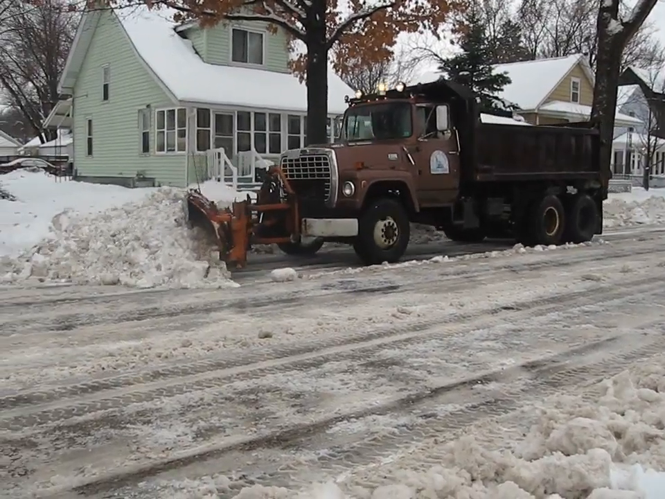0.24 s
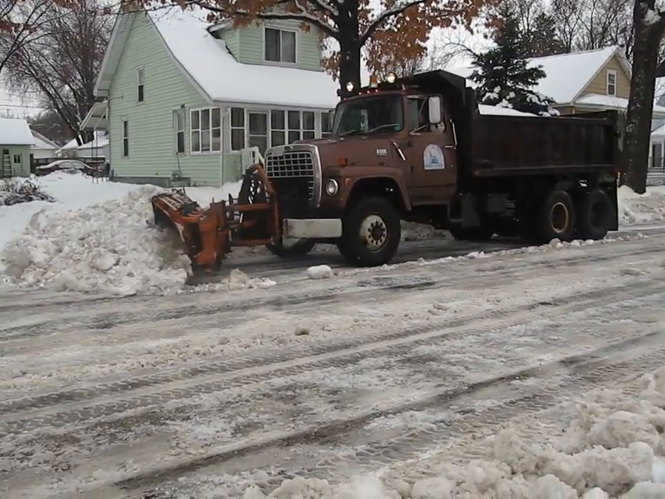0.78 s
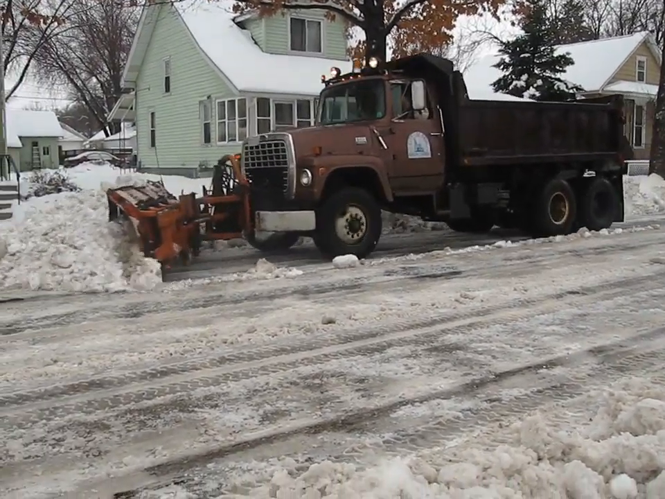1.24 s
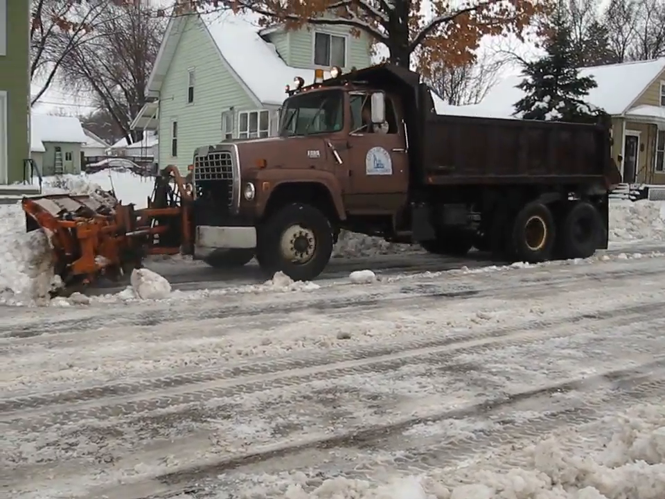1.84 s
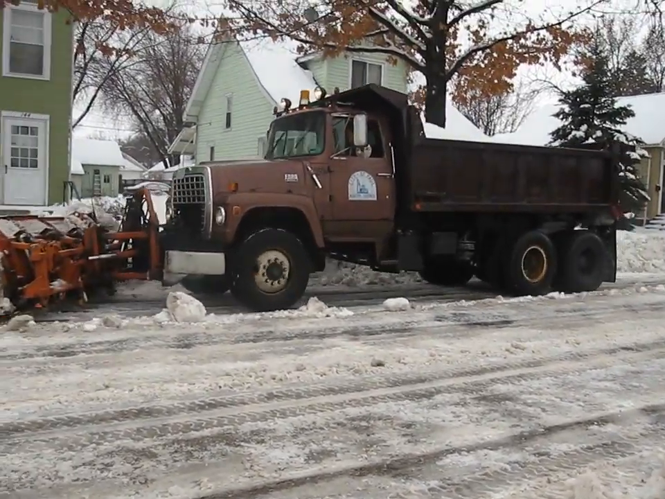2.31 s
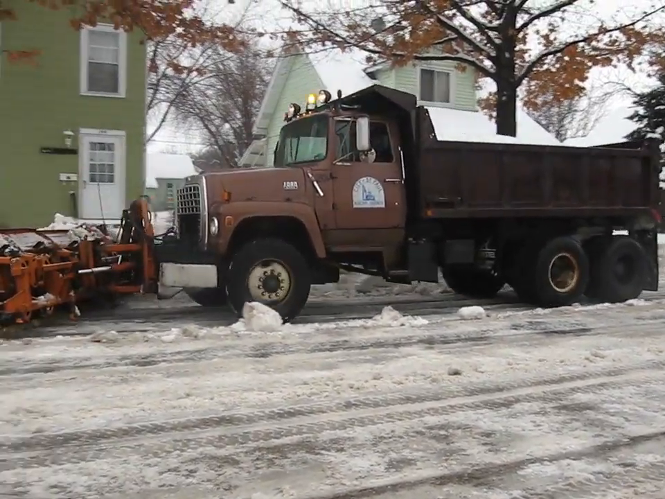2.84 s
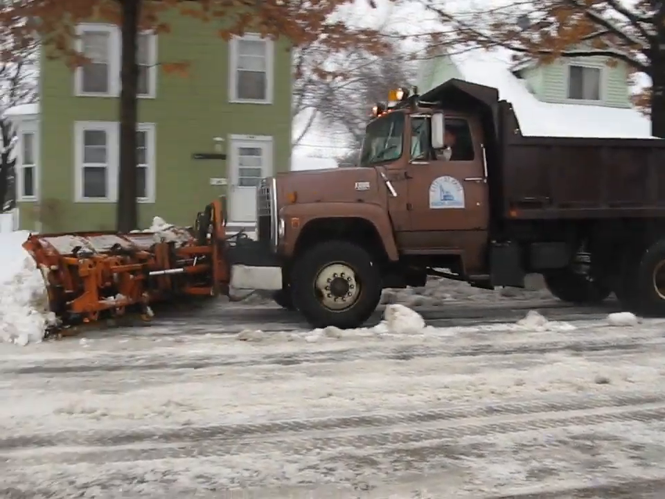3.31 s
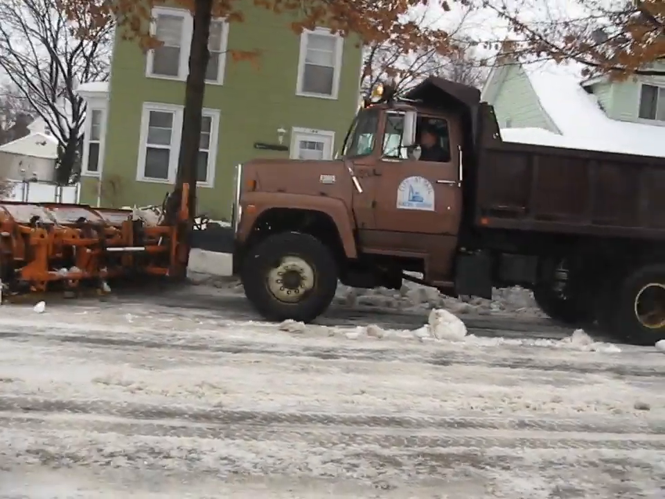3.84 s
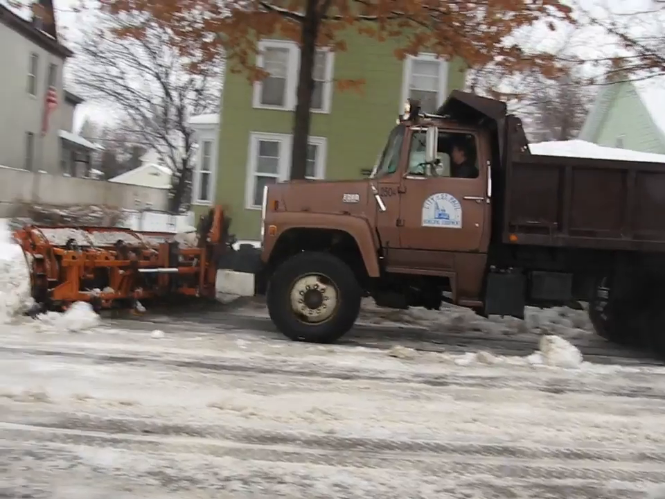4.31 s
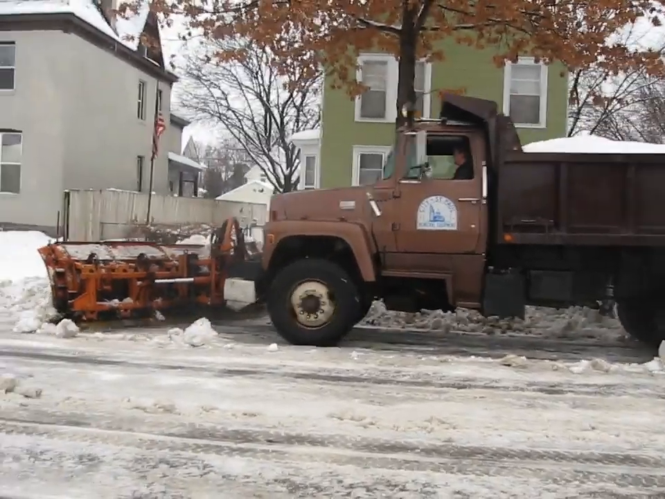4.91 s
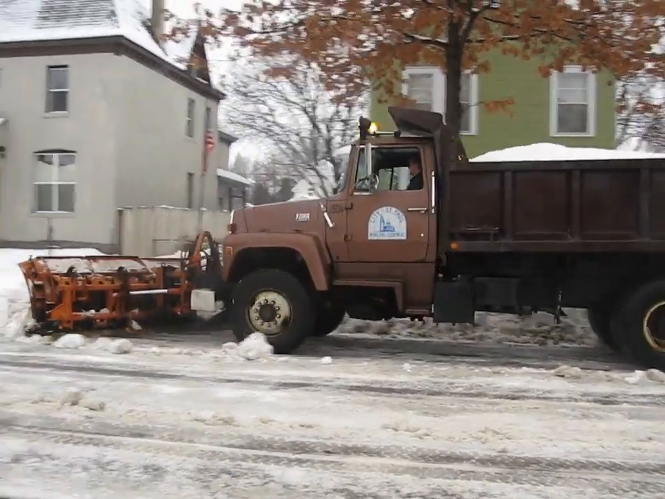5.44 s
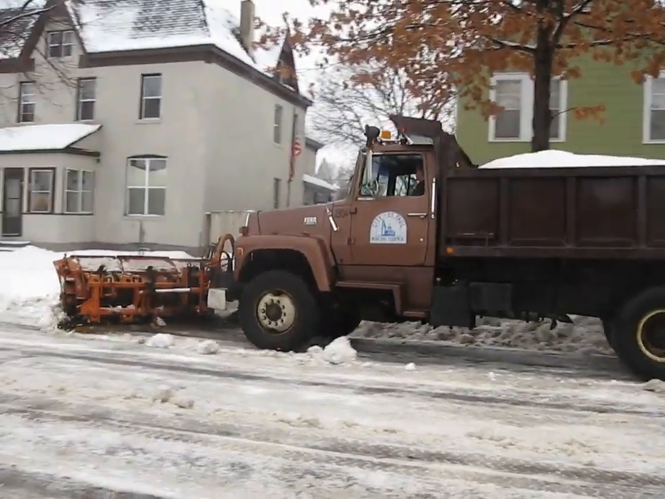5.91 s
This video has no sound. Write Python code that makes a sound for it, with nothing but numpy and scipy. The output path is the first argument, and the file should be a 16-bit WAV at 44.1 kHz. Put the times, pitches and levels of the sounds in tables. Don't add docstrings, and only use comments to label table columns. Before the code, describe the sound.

A heavy diesel plow truck is already running at 0 s and keeps a steady engine speed throughout, heard outdoors across a snowy street by a small camera. A low, pulsing drone and a humming fan tone slowly swell and fade as reflections from houses interfere. Over them lies a constant broadband roar with airy hiss, and a fast metallic injector clatter, about twenty-three loud ticks a second with weaker ones between. From about 1.5 s sharp knocks ring the panels; ticking grows clearer to about 3.5 s as the hood comes abreast, and knocks cluster from 2.3 to 4.8 s. Dull blade bumps come at 2.2 and 2.5 s, with a surge of low rumble near 4 s and a soft push at 4.2 s. Around 5.3 s comes the hardest thud, followed by short scrapes and bumps until 5.7 s over heavier rumble. The engine continues to the end, with coarse, band-limited treble.

```python
import sys
import numpy as np
from scipy import signal
from scipy.fft import rfft, irfft
from scipy.io import wavfile
from scipy.ndimage import uniform_filter1d

SR = 44100
rng = np.random.default_rng(int(sys.argv[2]) if len(sys.argv) > 2 else 0)


def amplitude_ratio(level_db):
    exponent = np.asarray(level_db, float) / 20
    return 10 ** exponent


def generate_wav(sig):
    pcm = np.round(np.clip(np.atleast_2d(sig).T, -1, 1) * 32767).astype(np.int16)
    wavfile.write(sys.argv[1], SR, pcm)


N = 271656
T = np.arange(N) / SR
SLOW = np.arange(0, N + 256, 256) / SR

# t/s, turns counted at the loud tick
CRANK_TURNS = [(0.0038, 0), (1.5416, 35), (2.8169, 64), (3.5204, 80), (4.2236, 96), (5.0143, 114),
               (5.8061, 132), (6.2021, 141)]
# t/s, level/dB
BLOCK_FACING = [(0.0, -28), (0.01, -30.5), (0.31, -31), (1.51, -30.5), (2.76, -34.5), (3.26, -34.5),
                (3.62, -37), (3.76, -34.5), (5.2, -32.5), (5.32, -35.5), (6.04, -30), (6.16, -33)]

# crank order, level/dB
WEAK_ORDERS = [(2, -67), (12, -62), (26, -55), (42, -54.5), (50, -55), (100, -61)]
STEADY_ORDERS = {5: -48.5, 21: -48, 28: -49, 30: -49, 32: -48, 33: -61, 34: -51, 48: -55.5, 49: -59}
ORDER_CANCELS = {3: [-.3, .8, 1.6, 2.6, 3.35, 4.75, 6.5], 6: [-1, 1.35, 2.36, 3.3, 4.38, 4.85, 5.66, 6.5],
                 9: [-.05, .6, 1.5, 2.5, 3.65, 4.45, 4.85, 5.95, 6.4], 12: [-.2, .5, 1.42, 2.4, 2.95, 3.45,
                 3.95, 4.85, 5.6, 6.15, 6.5], 27: [-.3, .4, .7, 3.03, 3.4, 4.0, 5.12, 5.86, 6.3], 7: [-.5,
                 .7, 1.9, 4.25, 5.6, 6.4], 8: [-1.5, 2.5, 7], 11: [-.2, .75, 1.95, 2.75, 3.35, 4.75, 5.5,
                 6.3], 18: [0, 2.1, 3.75, 5.38, 6.5], 36: [-.1, .9, 2.15, 3.45, 4.1, 5.3, 6.4], 39: [.25,
                 1.2, 2.8, 3.7, 4.15, 5.45, 6.3], 40: [-.2, .75, 1.75, 2.3, 2.9, 4.05, 5.0, 5.72, 6.6]}
ORDER_SWELLS = {3: [(.2, -40.5), (.15, -39), (0.2, -41.5), (.5, -49), (.6, -42), (0.4, -38), (0.3, -41)],
                6: [(.2, -22), (0.04, -27), (.65, -30.5), (0, -30.5), (0.7, -33), (0, -28), (0.7, -30.5),
                (.4, -26)], 9: [(0.3, -39.5), (0.6, -33.5), (0.04, -31), (0, -33.5), (0.3, -33.5),
                (0.3, -35), (0, -30), (0.6, -33.5), (.3, -38)], 12: [(0.2, -42), (.4, -37), (.2, -39.5),
                (0.7, -46.5), (.7, -42), (.6, -43), (.5, -45.5), (0.2, -39.5), (0.1, -35.5), (.6, -36),
                (.3, -42)], 27: [(0.3, -31.5), (0.36, -32.5), (0.05, -25.5), (0.3, -41), (.6, -40),
                (.45, -29), (.55, -33.5), (.8, -42), (.3, -40)]}
LESSER_SWELLS = {7: [-45, -47, -46.5, -37, -41.5, -38.5], 8: [-39.5, -39.5, -32], 11: [-47, -40.5, -43, -45,
                 -38.5, -46, -38.5, -36], 18: [-46.5, -46, -43, -42.5, -44], 36: [-40.5, -44, -42.5, -40.5,
                 -43.5, -39.5, -44], 39: [-39, -44.5, -42.5, -39, -41.5, -44, -43], 40: [-42.5, -46.5, -50,
                 -43.5, -37.5, -46, -47, -40, -43]}
LESSER_ECHO_SHARE = 0.32

FAN_PITCH = {1: 186.56, 3: 560.0, 4: 749.4}
FAN_NULLS = {1: [-1.3, 2.15, 2.8, 4.5, 6.1, 6.6], 3: [-.1, 1.3, 2.25, 3.55, 4.9, 5.72, 6.1, 6.5], 4: [-.05,
             .9, 2.15, 3.25, 3.95, 4.35, 5.0, 5.9, 6.4]}
FAN_ECHOES = {1: [(.2, -28.5), (0.13, -34), (.15, -31.5), (.12, -27.5), (0.52, -36), (.3, -32)],
              3: [(.4, -37), (.5, -36.5), (.5, -41), (0.99, -40.5), (.8, -42.5), (.7, -42.5), (.9, -52),
              (.5, -48)], 4: [(.4, -37.5), (.3, -39), (.7, -42), (.5, -43), (.6, -42), (.6, -38), (.4, -38),
              (.7, -40), (.3, -42.5)]}

# f/Hz, density/dB per Hz
ROAR_SPECTRUM = [(25, -26), (50, -4), (110, -1), (160, 0.5), (230, 2.5), (300, -2.5), (440, -7),
                 (560, -0.5), (750, 0.5), (1100, -3), (1900, -5.5), (3400, -6), (4600, -7.5), (5500, -13)]
# t/s, level/dB
SNOW_LOAD = [(0, -39.5), (.25, -46.5), (1.0, -46.5), (1.5, -41), (1.8, -43.5), (3.0, -48.5), (3.75, -46.5),
             (4.45, -44), (5.05, -33.5), (5.9, -33.5), (6.16, -35)]
# t/s, extra level/dB
BLADE_LURCHES = [
    (.58, 6.5),
    (2.25, 6),
    (2.68, 2.5),
    (3.59, 5.5),
    (4.03, 11),
    (4.79, 6.5),
]

# t/s, level/dB
TICK_LEVEL = [
    (0, -24.5),
    (.7, -22.5),
    (2.3, -19.5),
    (3.5, -18.5),
    (4.9, -20),
    (6.16, -20),
]
# f/Hz, level/dB
TICK_SPECTRUM = [(700, -27.5), (1500, -11.5), (2400, -0.5), (3500, 0), (4500, 1), (5500, -0.5)]
# t/s, half length/s, ring f/Hz, level/dB
FACING_PANELS = [(0.501, 0.87, 2920, 12), (3.248, 0.25, 4400, 7.5), (1.45, .3, 3500, 4.5),
                 (1.5, 0.18, 3080, 8), (1.55, 0.2, 4250, 9), (2.251, .6, 2880, 11),
                 (2.199, 0.44, 3790, 11.5), (2.9, 0.68, 3600, 14), (3.45, .25, 3310, 10),
                 (3.85, .35, 4130, 13), (4.0, 0.47, 2620, 10), (4.5, .45, 3880, 14),
                 (4.95, 0.77, 4380, 13.5), (5.1, 0.55, 3010, 9)]
# t/s, peak level/dB, ring f/Hz
HARD_KNOCKS = [(1.5424, -10, 3570), (1.6746, -8.5, 3610), (1.718, -12, 4300), (2.0258, -18, 2980),
               (2.2897, -9, 2900), (2.3341, -9.5, 3580), (2.3784, -13.5, 3770), (2.4214, -16, 3600),
               (2.817, -17.5, 3620), (2.9048, -21.5, 3650), (3.169, -14, 4420), (3.3009, -15.5, 3440),
               (3.3454, -17, 3590), (3.3885, -15.5, 3400), (3.476, -16, 3490), (3.5643, -9, 3320),
               (3.6076, -15.5, 4360), (3.6977, -21, 3290), (4.0483, -9.5, 3820), (4.1362, -11.5, 3880),
               (4.223, -11.5, 3400), (4.356, -9, 3900), (4.4862, -7.5, 4060), (4.5306, -15.5, 3850),
               (4.574, -12.5, 4020), (4.6618, -14.5, 3740), (4.795, -11, 4100), (4.837, -13.5, 4550),
               (4.9704, -16, 3880), (5.2782, -16, 2960)]

# t/s, peak level/dB, f/Hz, relative rise of pitch/(1/s)
BLADE_BUMPS = [
    (2.2, -24, 220, -5),
    (2.54, -20, 150, -6),
    (4.217, -21.5, 139, 1),
    (5.293, -12, 330, -3),
    (5.352, -23, 198, 9.5),
    (5.441, -22, 220, -1),
    (5.621, -23, 261, 16.5),
    (5.721, -24, 250, 0),
]
# f/Hz, level/dB
PLAYBACK_EDGE = [(3500, 0), (4500, -1.5), (5000, -3.5), (5500, -5.5), (6000, -14), (6500, -25), (7000, -41),
                 (7300, -72), (7600, -100)]


def evened(x):
    return x / np.sqrt(np.mean(x ** 2) + 1e-20)


def read(points, hz):
    f, value = np.transpose(points)
    return np.interp(np.log(hz + 1), np.log(f + 1), value)


def coloured(x, points):
    hz = np.fft.rfftfreq(len(x), 1 / SR)
    return irfft(rfft(x) * amplitude_ratio(read(points, hz)), len(x))


def curves(rows, t=T):
    s, *columns = np.transpose(rows)
    return [np.interp(t, s, c) for c in columns]


def wander(top_hz):
    total = 0
    for f in np.geomspace(.15, top_hz, 12):
        total = total + np.sin(2 * np.pi * (f * SLOW + rng.random())) / np.sqrt(f)
    return evened(total)


def resonate(x, hz, width):
    turn = np.exp(2j * np.pi * np.cumsum(hz) / SR)
    r = np.exp(-np.pi * width / SR)
    return 2 * (turn * signal.lfilter([1 - r], [1, -r], x / turn)).real


def tone(turning, db, shake):
    phase = 2 * np.pi * rng.random() + shake * wander(3.0)
    path = np.sqrt(2) * amplitude_ratio(db) * np.exp(1j * phase)
    return (turning * np.interp(T, SLOW, path)).real


def echoed_db(s, swells):
    s = np.array(s)
    share, peak_db = np.transpose(swells)
    slip = np.interp(SLOW, s, np.arange(len(s)))
    share = np.clip(np.interp(SLOW, s, share), 0, .97)
    both = abs(1 - share * np.exp(2j * np.pi * slip)) / (1 + share)
    swell_s = np.r_[(s[1:] + s[:-1]) / 2, s[-1]]
    shimmer_db = 1.0 * wander(5.0)
    return np.interp(SLOW, swell_s, peak_db) + 20 * np.log10(both) + shimmer_db


def exhaust(turns):
    near_db = curves(BLOCK_FACING, SLOW)[0]
    near_db = 0.9 * (near_db - near_db.mean())
    firing_db = 6
    crank = np.exp(2j * np.pi * turns)
    order, out = crank, 0
    for k in range(2, 101):
        order = order * crank
        if k in ORDER_CANCELS:
            swells = ORDER_SWELLS.get(k)
            if swells is None:
                swells = [(LESSER_ECHO_SHARE, db) for db in LESSER_SWELLS[k]]
            out = out + tone(order, echoed_db(ORDER_CANCELS[k], swells), .3)
        else:
            weak_db = np.interp(k, *np.transpose(WEAK_ORDERS)) + firing_db * (k % 3 == 0)
            db = STEADY_ORDERS.get(k, weak_db)
            out = out + tone(order, db + near_db + 2.53 * wander(2.2), 0.54)
    return out


def fan():
    second_hz, second_db = 371.8, -50
    out = tone(np.exp(2j * np.pi * second_hz * T), second_db + 3.2 * wander(1.8), 0.33)
    for k, hz in FAN_PITCH.items():
        out = out + tone(np.exp(2j * np.pi * hz * T), echoed_db(FAN_NULLS[k], FAN_ECHOES[k]), 0.55)
    return out


def roar():
    frames, hz = N // 256 + 5, np.fft.rfftfreq(1024, 1 / SR)
    t = np.arange(frames) * 256 / SR
    a, b, patches = rng.standard_normal((frames, 513, 3)).T
    patches = uniform_filter1d(patches, 10, 0)
    patches = evened(uniform_filter1d(patches, 20, 1))
    load, block = (c - c.mean() for c in curves(SNOW_LOAD, t) + curves(BLOCK_FACING, t))

    lurch_s = 0.054
    lurch_db = sum(db * np.exp(-((t - s) / lurch_s) ** 2) for s, db in BLADE_LURCHES)
    rumble = 0.68 * load + lurch_db + 2.5 * np.interp(t, SLOW, wander(8.9))
    hiss = 0.39 * block + 1.37 * np.interp(t, SLOW, wander(8.0))

    low = 1 / (1 + (hz[:, None] / 330) ** 4)
    high = 1 / (1 + (2100 / (hz[:, None] + 1)) ** 4)
    level_db = low * rumble + (1 - low - high) * block + high * hiss
    z = (a + 1j * b) * amplitude_ratio(read(ROAR_SPECTRUM, hz)[:, None] + level_db + 1.38 * patches)
    noise = signal.istft(z, nperseg=1024, noverlap=768)[1][:N]
    return amplitude_ratio(-26.0) * evened(noise)


def clatter(turns):
    loud_db = curves(TICK_LEVEL)[0]
    firing = np.floor(3 * turns).astype(int) + 3
    luck = rng.uniform(-0.78, 1, (firing.max() + 1, 3))[firing].T
    since = (3 * turns % 1) / (3 * 22.75)
    other_firings_db = -11
    size_db = loud_db + other_firings_db * (firing % 3 > 0) + 1.3 * luck[0]
    shape = (1 - np.exp(-(since / 0.00045) ** 2)) * np.exp(-since / 0.0027)
    steady = amplitude_ratio(loud_db - 16.0)
    burst = (amplitude_ratio(size_db) * shape + steady) * rng.standard_normal(N)

    ringing = 0
    for s, half, hz, db in FACING_PANELS:
        facing = np.exp(-((T - s) / half) ** 2)
        ringing = ringing + amplitude_ratio(db - 4.5) * facing * resonate(burst, np.full(N, hz), 160)

    lower = resonate(burst, 3200 + 800 * luck[1], 500)
    upper = resonate(burst, 4800 + 800 * luck[2], 450)
    return coloured(burst + 1.44 * (lower + upper), TICK_SPECTRUM) + ringing


def knocks():
    out, t = np.zeros(N), np.arange(600) / SR
    shape = (1 - np.exp(-t / 0.00055)) * np.exp(-t / 0.0025)
    for s, db, hz in HARD_KNOCKS:
        ring = np.sin(2 * np.pi * hz * t)
        ring = ring + 0.29 * np.sin(2 * np.pi * (hz * t + rng.random()))
        out[round(s * SR):][:len(t)] += amplitude_ratio(db - 5.5) * ring * shape
    return out


def bumps():
    out, t = np.zeros(N), np.arange(-1500, 2400) / SR
    for s, db, hz, rise in BLADE_BUMPS:
        length = np.where(t < 0, .45, .9) / hz + 0.00091 * rise
        cycles = hz * t * (1 + rise * t / 2)
        push = -np.cos(2 * np.pi * cycles) * np.exp(-(t / length) ** 2)
        crunch = uniform_filter1d(rng.standard_normal(len(t)), size=40) * np.exp(-abs(t) / .005)
        out[round(s * SR) - 1500:][:len(t)] += amplitude_ratio(db) * (push + 2.8 * crunch)
    return out


def scene():
    counted = curves(CRANK_TURNS)[0]
    turns = uniform_filter1d(counted, size=8001, mode="nearest")
    turns[:4000] = T[:4000] * 22.76 - .0865
    turns[-4000:] = counted[-4000:]
    return (exhaust(turns) + fan() + roar() + clatter(turns) + knocks() + bumps())[None]


def band_limit(x):
    return signal.sosfilt(signal.butter(12, 7060, fs=SR, output="sos"), x)


def record(dry):
    running = np.pad(dry[0], 2048, mode="reflect")
    kept = signal.oaconvolve(running, signal.firwin(1023, SR / 8, fs=SR), "same")
    sampled = 4 * kept * (np.arange(len(kept)) % 4 == 0)
    played = coloured(sampled, PLAYBACK_EDGE)[None, 2048:-2048]
    dc_offset = -.0034
    return band_limit(played + dc_offset)


dry = scene()
out = record(dry)
generate_wav(out)
```